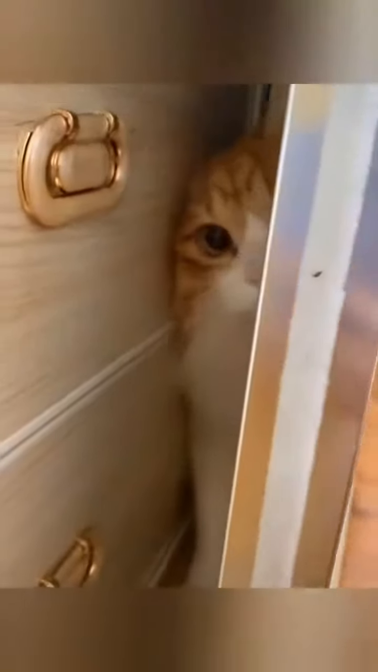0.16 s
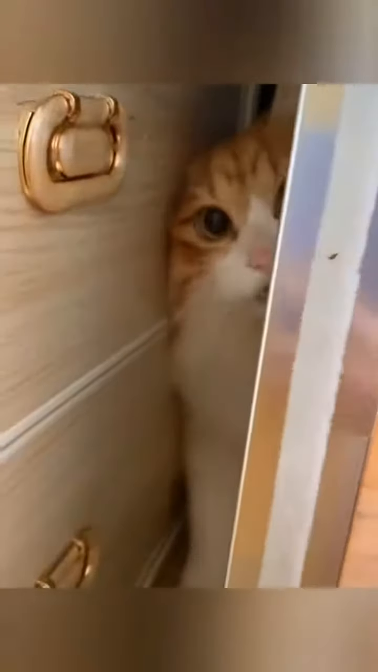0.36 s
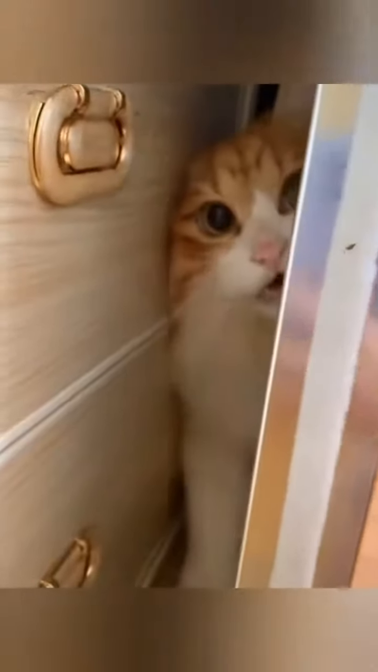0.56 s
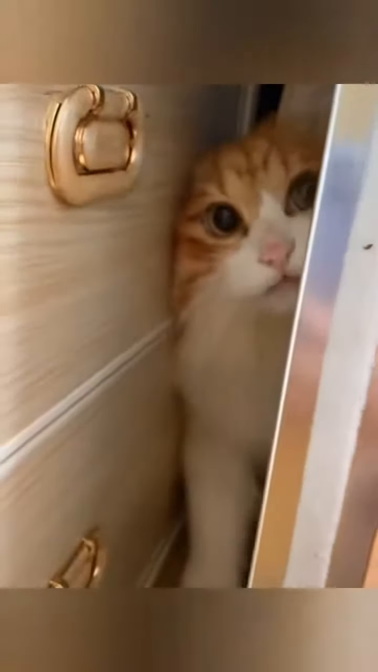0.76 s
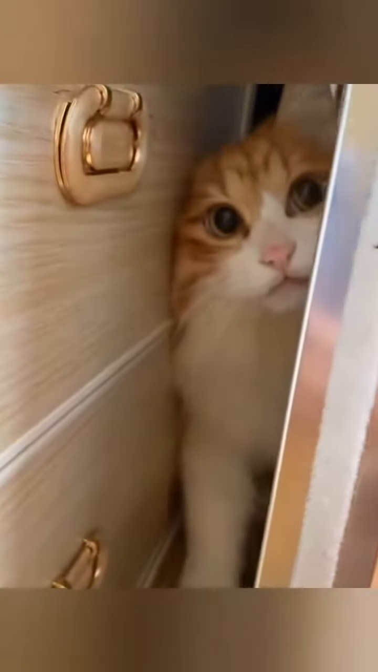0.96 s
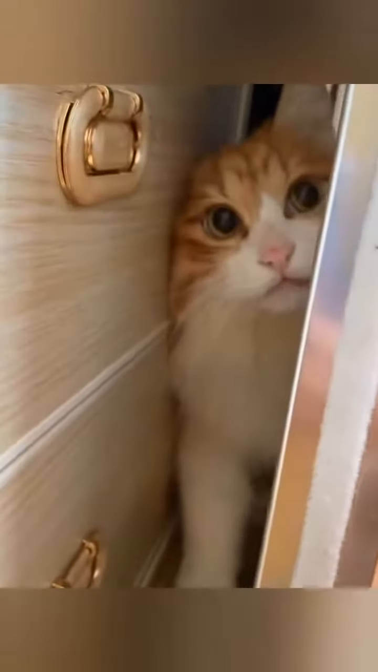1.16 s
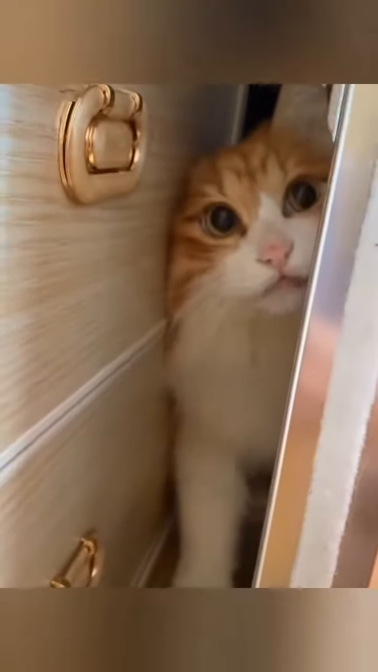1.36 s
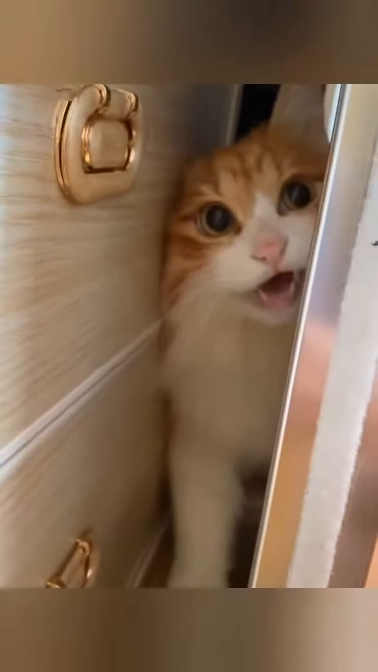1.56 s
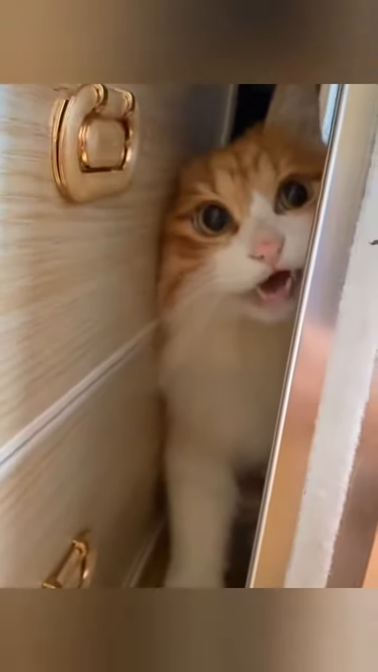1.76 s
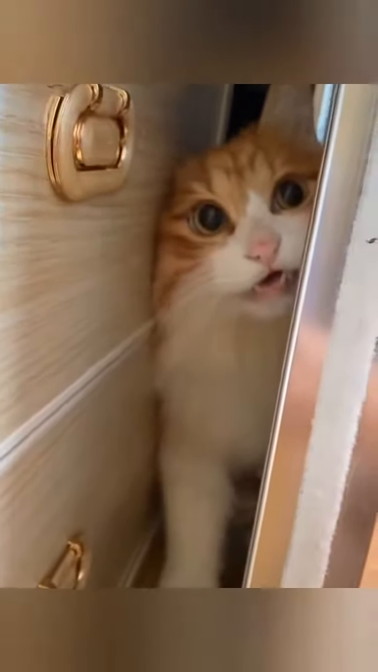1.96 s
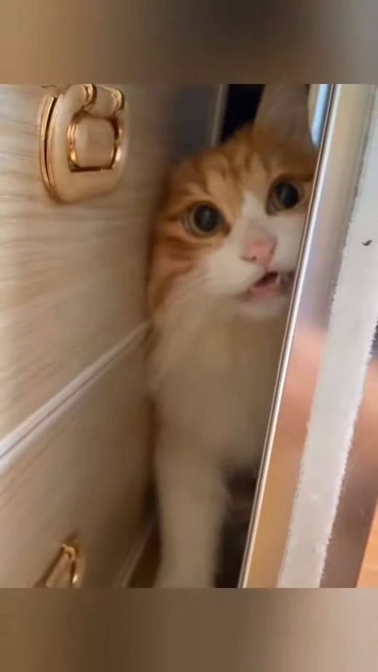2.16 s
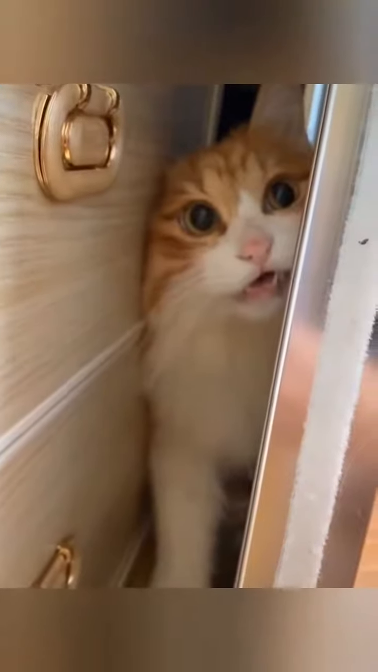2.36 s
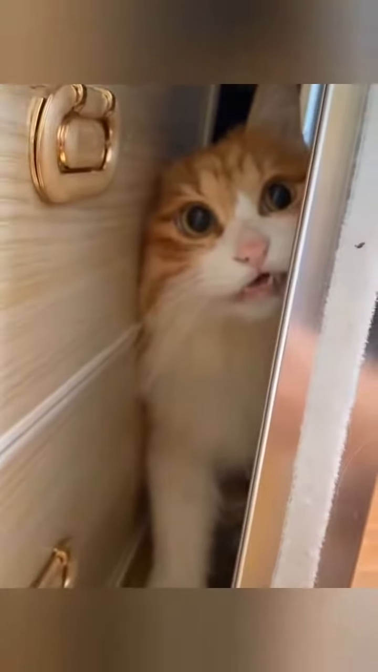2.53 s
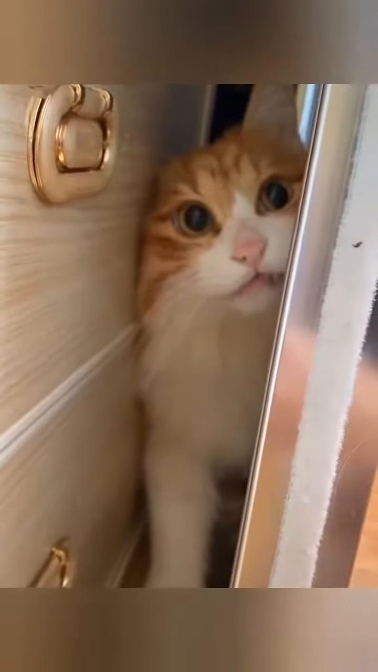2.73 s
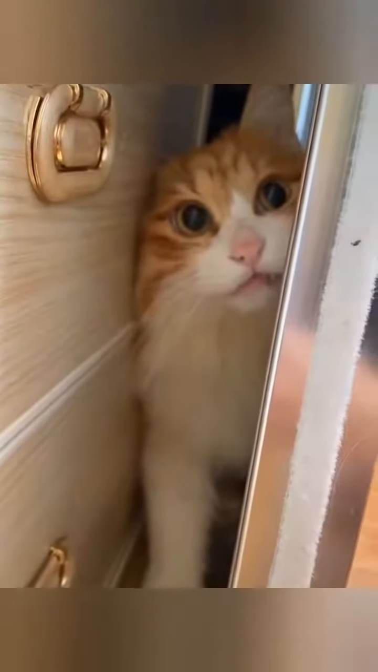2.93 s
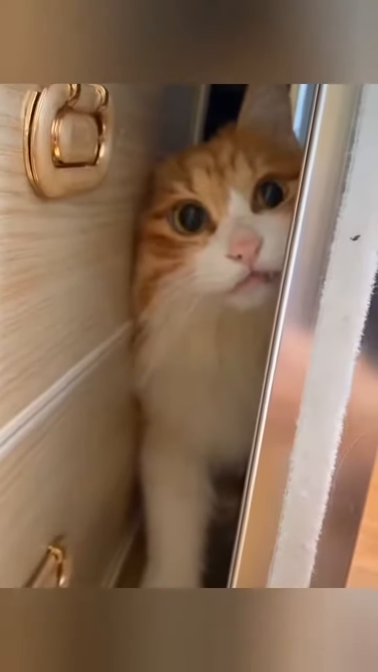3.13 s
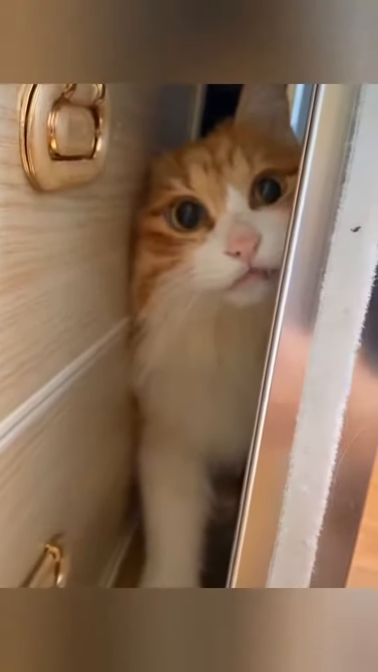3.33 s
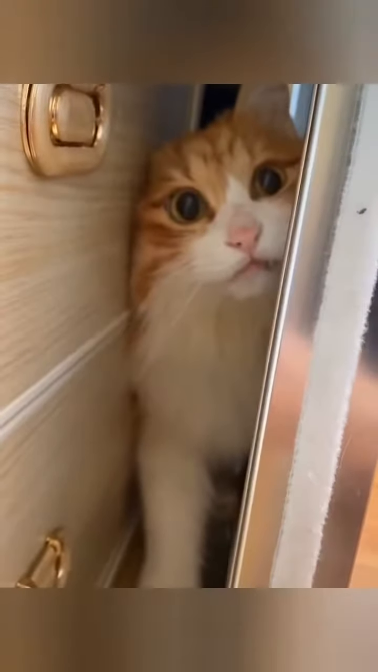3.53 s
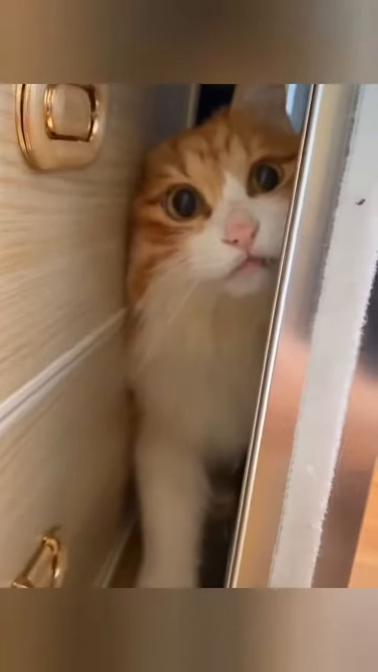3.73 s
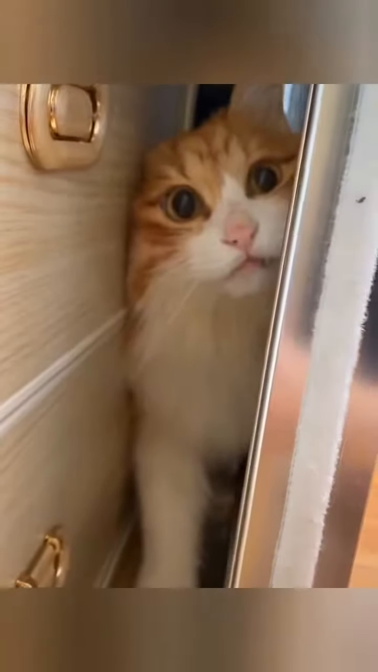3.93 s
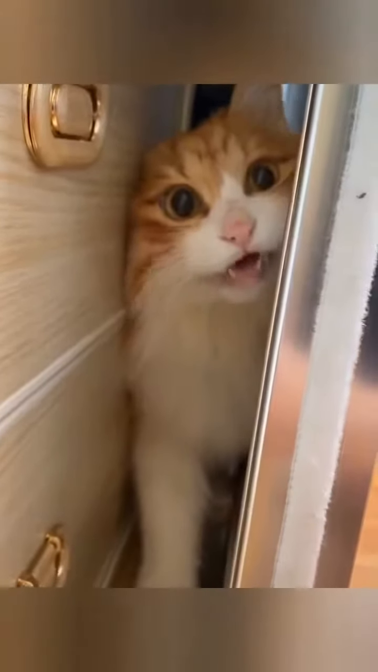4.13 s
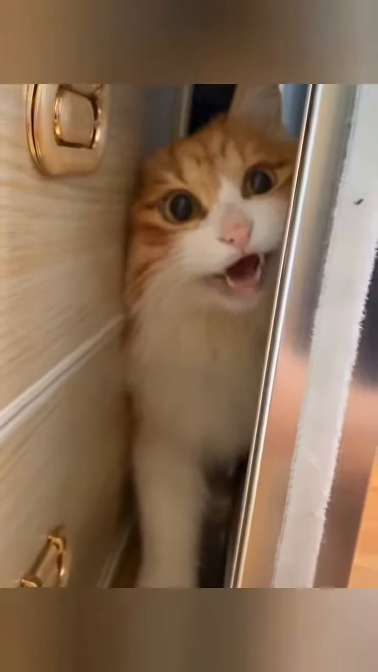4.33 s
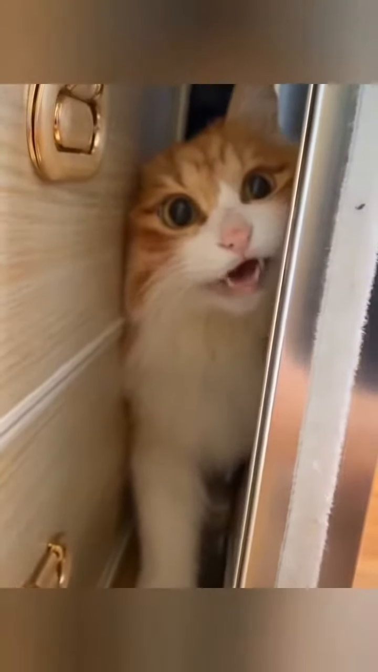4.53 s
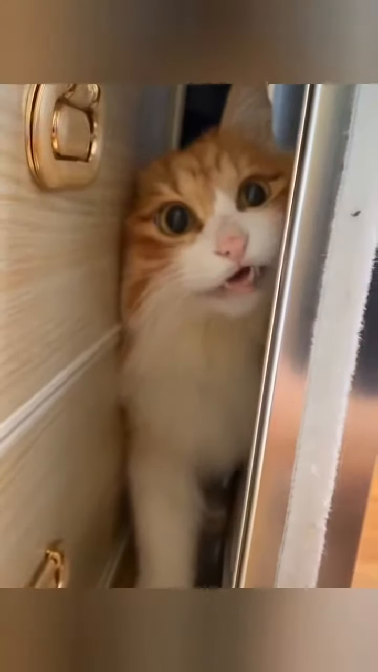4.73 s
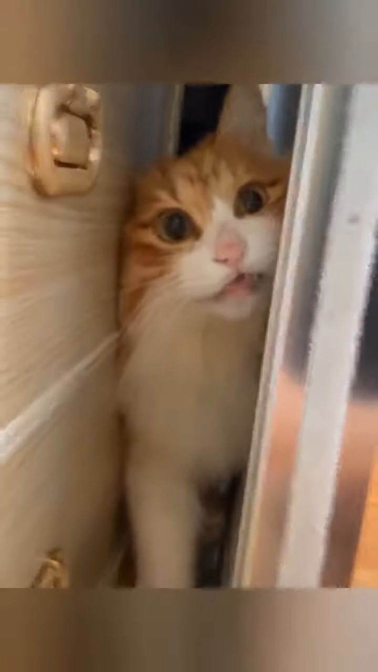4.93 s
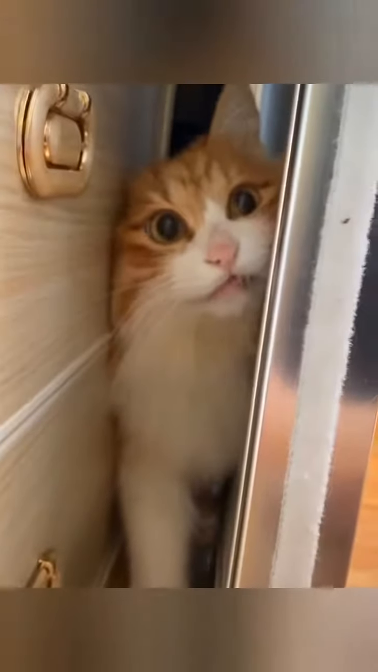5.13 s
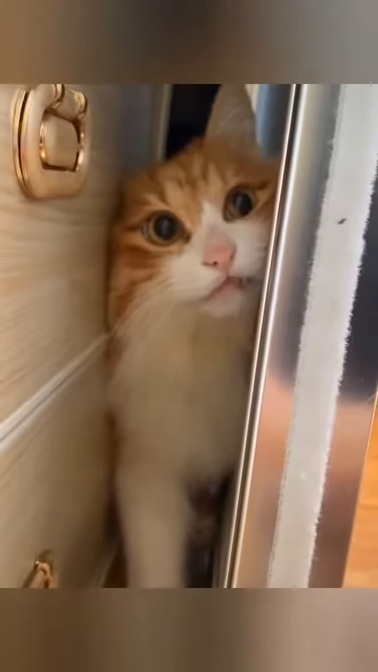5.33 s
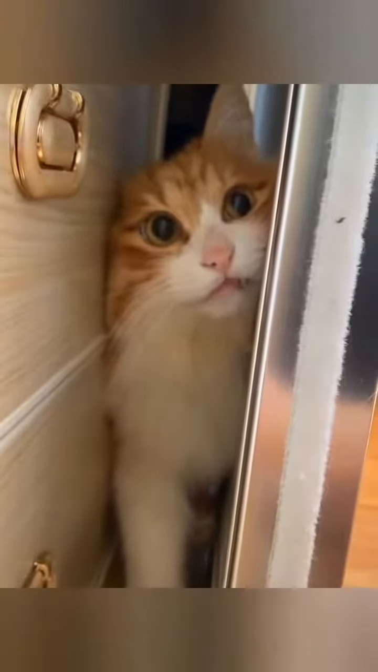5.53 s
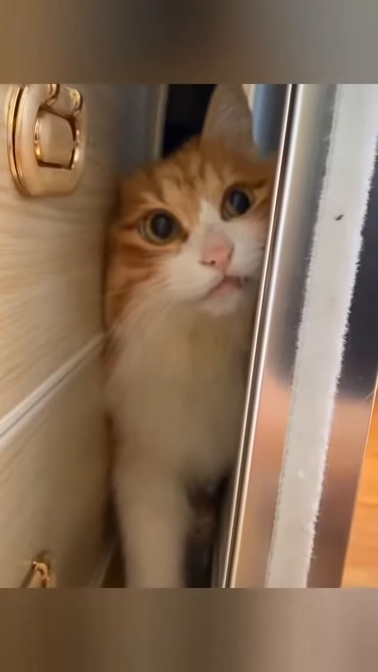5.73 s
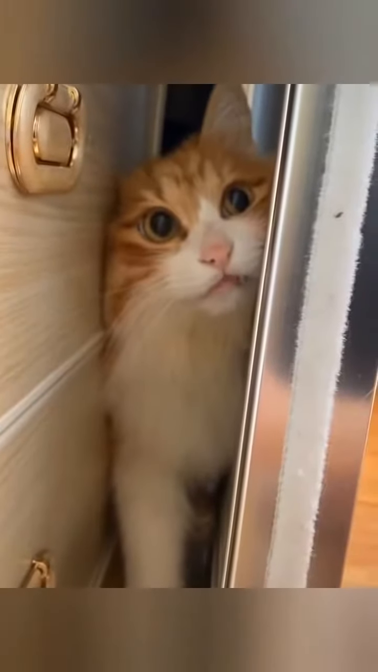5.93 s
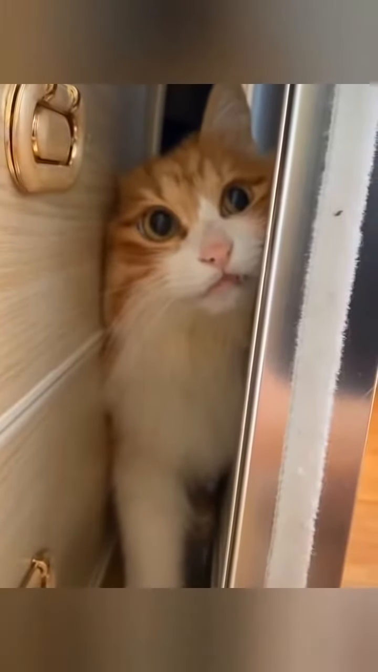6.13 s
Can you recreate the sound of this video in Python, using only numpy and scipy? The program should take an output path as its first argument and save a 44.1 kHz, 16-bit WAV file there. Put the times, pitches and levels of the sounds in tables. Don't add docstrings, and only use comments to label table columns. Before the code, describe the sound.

Low boomy traffic drifts in from afar, its tyre hiss swelling briefly near the start and then thinning. Over it a nearby cat calls: a quick mew, a gentle rising and falling meow, a strong short cry, then a drawn-out meow sinking in pitch. Mouth clicks and soft breaths close the sounds. The phone's two microphones hear the narrow door gap colour left and right differently.

```python
import sys
import numpy as np
from scipy import signal
from scipy.fft import rfft, irfft
from scipy.io import wavfile
from scipy.ndimage import uniform_filter1d

SR = 44100
rng = np.random.default_rng(int(sys.argv[2]) if len(sys.argv) > 2 else 0)


def elevation(decibels):
    levels = np.asarray(decibels, float)
    return 10 ** (levels / 20)


def wav_out(sig):
    wavfile.write(sys.argv[1], SR, np.round(np.clip(np.atleast_2d(sig).T, -1, 1) * 32767).astype(np.int16))


N = 276948


def evened(x):
    return x / np.sqrt(np.mean(x ** 2) + 1e-20)


def read(points, hz):
    f, *columns = np.transpose(points)
    return [np.interp(np.log(hz + 1), np.log(f + 1), c) for c in columns]


def play(rows):
    s, *columns = np.transpose(rows)
    t = np.arange(s[0], s[-1], 1 / SR)
    return s[0], [np.interp(t, s, c) for c in columns]


def add(mix, s, sound):
    part = mix[round(s * SR):][:len(sound)]
    part += sound[:len(part)]


def wobble(count, smooth):
    noise = rng.standard_normal(count)
    return evened(uniform_filter1d(uniform_filter1d(noise, smooth), smooth))


# pitch_hz [Hz], level_db [dB per Hz]
TRAFFIC_COLOUR = [(50, -2), (170, -5.5), (270, -11), (420, -16), (700, -16), (1000, -14.5), (1700, -26.5),
                  (2400, -28.5), (3300, -42.5), (5500, -51), (7600, -54.5), (10600, -56.5), (13400, -58.5),
                  (14200, -78.5)]
# pitch_hz [Hz], width_hz [Hz], boost_db [dB]
ROOM_BOOMS = [(60.3, 11, 5), (118.5, 14, 6), (154.7, 3.9, 10), (205, 6.7, 6.5), (253.4, 13, 6.5),
              (339, 12, 4)]
# pitch_hz [Hz], likeness [0-1], left_lead_rad [radians], left_minus_right_db [dB]
TRAFFIC_AT_PORTS = [(50, .995, 0, .3), (130, .97, 0, .8), (260, .88, -.1, 2.2), (420, .55, -.8, 4),
                    (700, .5, -2.4, 2), (1000, .35, -1.5, 0), (1700, .2, -3, 0), (2600, .65, -3.4, -1),
                    (3700, .35, -5.7, 0), (5500, .4, -5.5, 0), (7600, .9, -3.1, 0), (10700, .9, 0, 0),
                    (13000, .9, 3.1, 0)]
RUMBLE_DB, RUMBLE_DB_PER_S = -37, -0.67
ROAR_DB, HISS_DB, HISS_DB_PER_S = -37.5, -34.5, -1.5
SWISH_S, SWISH_WIDTH_S, SWISH_DB = 0.61, 0.47, 7
MICROPHONE_HISS_DB = -40.5


def traffic():
    size, hop = 1024, 256
    frames = N // hop + 40
    hz = np.fft.rfftfreq(size, 1 / SR)
    a, b, c, d, patches = rng.standard_normal((frames, len(hz), 5)).T
    patches = evened(uniform_filter1d(uniform_filter1d(patches, 10, 0), 14, 1))
    columns = read(TRAFFIC_COLOUR, hz) + read(TRAFFIC_AT_PORTS, hz)
    colour_db, same, lead, balance_db = (v[:, None] for v in columns)

    t = (np.arange(frames) - 20) * hop / SR
    rumble_db = RUMBLE_DB + RUMBLE_DB_PER_S * t
    swish_db = SWISH_DB * np.exp(-((t - SWISH_S) / SWISH_WIDTH_S) ** 2)
    hiss_db = HISS_DB + HISS_DB_PER_S * t + swish_db
    roar = np.clip(np.log2(hz / 300 + 1e-9), 0, 1)[:, None]
    hiss = np.clip(np.log2(hz / 1300 + 1e-9), 0, 1)[:, None]
    tyres = np.clip(np.log2(7000 / (hz + 1)), 0, 1)[:, None]
    top_db = tyres * hiss_db + (1 - tyres) * MICROPHONE_HISS_DB
    field_db = colour_db + 1.72 * patches
    field_db = field_db + (roar - hiss) * (ROAR_DB - rumble_db) + hiss * (top_db - rumble_db)

    right = a + 1j * b
    own = c + 1j * d
    left = (same * right + np.sqrt(1 - same ** 2) * own) * np.exp(1j * lead)
    tilt = elevation(balance_db / 2)
    spectra = np.array([left * tilt, right / tilt]) * elevation(field_db)
    noise = signal.istft(spectra, nperseg=size, noverlap=size - hop)[1]

    fine_hz = np.fft.rfftfreq(noise.shape[1], 1 / SR)
    boom = 1
    for f, width, db in ROOM_BOOMS:
        boom = boom + elevation(db) ** 2 / (1 + (2 * (fine_hz - f) / width) ** 2)
    street = irfft(rfft(noise) * np.sqrt(boom))[:, 20 * hop:20 * hop + N]
    return evened(street) * elevation(RUMBLE_DB + RUMBLE_DB_PER_S * np.arange(N) / SR)


# start_s [s], peak_s [s], end_s [s], pitch_hz [Hz], peak_db [dB]
ENGINE_NOTES = [
    (0.287, 0.507, 0.79, 152.5, -35.5),
    (2.616, 2.806, 3.4, 522, -53),
]


def drone(start, peak, end, hz, peak_db):
    t = np.arange(start, end, 1 / SR)
    db = peak_db + np.interp(t, [start, peak, end], [-18, 0, -18])
    tone = np.sqrt(2) * np.sin(2 * np.pi * hz * t)
    return start, elevation(db) * tone * signal.windows.tukey(len(t), .3)


# pitch_hz [Hz], level_db [dB per Hz]
BREATH_COLOUR = [(200, -12), (500, 3), (1200, 0.5), (2300, 1.5), (3500, -2.5), (4800, -10), (6000, -5.5),
                 (8000, -20), (11000, -24), (12800, -34), (14500, -20), (16000, -29)]


def air(count, tilt_db):
    hz = np.fft.rfftfreq(count, 1 / SR)
    shape = elevation(read(BREATH_COLOUR, hz)[0] + tilt_db * np.log2((hz + 100) / 2300))
    return evened(irfft(rfft(rng.standard_normal(count)) * shape, count))


# time_s [s], pitch_hz [Hz], effort_db [dB], mouth_opening [0-1], fold_pressure [0-1]
SHORT_MEOW = [
    (0.478, 863, -39.5, 1, 1),
    (0.489, 816, -33.5, 0.68, 0.99),
    (0.507, 818, -31.5, .75, 1),
    (0.529, 758.6, -27.5, 0.98, 0.7),
    (0.558, 739, -25, 0.98, 0.64),
    (0.589, 755, -25, .7, 0.24),
    (0.612, 785, -31.5, 0.57, 0.57),
    (0.632, 807, -38.5, 0.7, .3),
]
ARCHED_MEOW = [
    (1.563, 790, -38, 1, .5),
    (1.572, 771.5, -29, 0.77, 0.82),
    (1.607, 817, -29, 0.86, 0.91),
    (1.635, 832.6, -30, 0.91, 0.9),
    (1.67, 836.5, -28.5, 0.68, 0.8),
    (1.741, 790.3, -32, 0.81, 0.73),
    (1.782, 781.5, -31, 0.77, 0.51),
    (1.88, 773.4, -28.5, 0.48, 0.27),
    (1.935, 776, -41.5, .05, 0.16),
]
LOUD_MEOW = [
    (2.35, 825, -33, 0.62, 1),
    (2.364, 755, -24.5, 0.66, 0.77),
    (2.39, 736, -21.5, 0.77, 0.55),
    (2.42, 756.6, -22.5, 0.72, 0.7),
    (2.458, 745, -21.5, 0.53, .7),
    (2.504, 736, -19.5, 0.46, 0.36),
    (2.52, 753.6, -21, 0.38, .3),
    (2.54, 726, -22, 0.52, 0.095),
    (2.561, 725, -42.5, .6, .45),
]
LONG_MEOW = [
    (4.264, 787, -41, 1, .8),
    (4.271, 763, -27, 0.65, 0.86),
    (4.302, 824, -31, 1, 1),
    (4.35, 837.7, -25.5, 0.7, 0.64),
    (4.444, 800.7, -29, 0.85, 0.58),
    (4.62, 767.5, -28.5, 0.59, 0.23),
    (4.773, 758, -26.5, .56, 0.32),
    (4.9, 738, -24, 0.35, 0.22),
    (4.995, 703, -34.5, 0.37, 0.51),
]
# higher_overtones_db [dB
# over effort], brightness [dB per octave], fourth_overtone_db [dB]
MEOW_COLOURS = [
    (-8.5, 0, 4.5),
    (-11, 1, 4.5),
    (-14.5, 3.5, 8),
    (-10, -5, -6),
]
# pitch_hz [Hz], level_db [dB]
OPEN_THROAT = [(2900, -4.5), (3300, 1), (3750, 6), (4150, 0), (4550, -10), (5000, -4), (5300, -25.5),
               (5800, -17), (6100, -11.5), (6700, -16), (7700, -37), (9000, -31.5), (11500, -34),
               (15000, -41.5)]
SHUT_THROAT = 0.94
SECOND_DB, SECOND_SLACK_DB = -5, -27
THIRD_DB, THIRD_SHUT_DB = 5, -40
HIGH_SHUT_DB, HIGH_SLACK_DB = -150, -17
HIGH_RISE_S = 0.0043
RASP_DB, ONSET_RASP_DB, ONSET_S, END_RASP_DB, END_S = -35.5, 12, .015, 13, .025


def meow(rows, high_db, slope_db, fourth_db, jitter=0.0032, shimmer_db=0.71, blur=0.0042):
    start, (hz, first_db, mouth, press) = play(rows)
    n = len(hz)
    t = np.arange(n) / SR
    shut, slack = 1 - mouth, 1 - press
    second_db = first_db + SECOND_DB + SECOND_SLACK_DB * slack
    third_db = first_db + THIRD_DB + THIRD_SHUT_DB * shut
    high_db = first_db + high_db + HIGH_SHUT_DB * shut ** 4 + HIGH_SLACK_DB * slack
    throat_shift = SHUT_THROAT + (1 - SHUT_THROAT) * mouth

    turns = 2 * np.pi * np.cumsum(hz * (1 + jitter * wobble(n, smooth=120))) / SR
    rasp_db = RASP_DB + ONSET_RASP_DB * np.exp(-t / ONSET_S) + END_RASP_DB * np.exp((t - t[-1]) / END_S)
    rasp_db = rasp_db + 9 * np.exp(-t / .07)
    turns += .6 * elevation(rasp_db) * wobble(n, smooth=24)
    sway_db = [shimmer_db * wobble(n, smooth=300) for k in range(21)]

    voice = np.zeros(n)
    for k, db in enumerate([first_db, second_db, third_db], 1):
        voice += elevation(db + sway_db[k]) * np.sin(k * turns + k)

    strength = {}
    for k in range(4, 21):
        throat_db = read(OPEN_THROAT, k * hz / np.clip(throat_shift, .8, 1.25))[0]
        strength[k] = elevation(throat_db + slope_db * np.log2(k / 5) + fourth_db * (k == 4))
    total = np.sqrt(sum(strength[k] ** 2 for k in range(4, 9)))
    high = np.zeros(n)
    for k in strength:
        wander = k * k * (1 + blur * wobble(n, smooth=40))
        high += strength[k] * elevation(3.3 * sway_db[k]) * np.sin(k * turns + wander)
    voice += np.clip(t / HIGH_RISE_S, 0, 1) * elevation(high_db) / total * high

    rasp = 1 + elevation(rasp_db) * wobble(n, smooth=24)
    hiss_db = high_db - 31 + 0.45 * (rasp_db - RASP_DB)
    hiss = elevation(hiss_db) * (1 + 0.72 * np.cos(turns)) * air(n, -1.5)
    return start, (np.sqrt(2) * voice * rasp + hiss) * signal.windows.tukey(n, 400 / n)


# start_s [s], peak_db [dB], ring_hz [Hz], fade_by_60_db_s [s]
MOUTH_CLICKS = [(0.6276, -22, 2220, 0.0082), (.632, -21, 2120, 0.0063), (0.637, -27.5, 2370, 0.01),
                (1.354, -50, 14460, 0.0086), (1.364, -47.5, 4750, 0.018), (1.786, -39.5, 5350, 0.014),
                (2.540, -21, 2250, 0.0088), (2.548, -21.5, 2360, 0.0048), (2.551, -26.5, 2180, 0.007),
                (1.785, -41, 8650, .012), (2.571, -27.5, 410, 0.044), (3.654, -36.5, 877, 0.0097),
                (4.071, -46.5, 4820, 0.017), (4.088, -50, 9700, 0.0077), (4.959, -22.5, 1262, 0.023),
                (4.958, -46, 5680, 0.009), (4.963, -20.5, 616, 0.086), (4.958, -26, 277, 0.16),
                (4.976, -28.5, 72.3, 0.28), (4.988, -22, 2290, 0.0085), (4.989, -23.5, 312, 0.064),
                (4.9874, -34, 3700, 0.015), (4.991, -26, 2545, 0.015), (5.009, -26.5, 865, 0.023),
                (5.012, -35.5, 2370, 0.016), (5.136, -60.5, 10500, .012)]


def click(s, peak_db, hz, t60, snap_db=-22, snap_t60=.006):
    t = np.arange(SR // 8) / SR
    ring = elevation(-60 * t / t60) * np.sin(2 * np.pi * hz * t) * np.clip(t * hz / 0.61, 0, 1)
    snap_db = snap_db + 6 * np.log2(min(hz / 2000, 1))
    snap = elevation(snap_db - 60 * t / snap_t60) * air(len(t), -4)
    return s, elevation(peak_db) * (ring + snap)


# start_s [s], level_db [dB], rise_s [s], fade_by_60_db_s [s], tilt [dB per octave]
AIR_PUFFS = [(0.63, -40.5, 0.0072, 0.16, -3), (1.346, -64, .008, .15, 14), (1.7815, -57.5, 0.0073, .2, 9.5),
             (2.549, -52.5, 0.01, 0.16, -0.5), (2.560, -40.5, 0.012, 0.19, -2.5),
             (3.762, -47.5, 0.12, 0.32, -9), (4.063, -60.5, 0.011, 0.18, 16),
             (4.322, -50.5, 0.021, 0.21, -2.5), (4.9544, -30.5, 0.006, 0.24, -14.5),
             (4.987, -38.5, 0.0044, 0.22, -3), (1.49, -63.5, 0.077, .1, 2), (2.332, -59, .02, .09, 1),
             (4.19, -56.5, 0.086, .1, -1.5)]


def puff(s, level_db, rise, t60, tilt_db):
    t = np.arange(SR // 3) / SR
    flutter_db = 2.2 * wobble(len(t), smooth=120)
    fade_db = -60 * np.maximum(t - rise, 0) / t60
    shape = np.clip(t / rise, 0, 1) * elevation(level_db + fade_db + flutter_db)
    return s, shape * air(len(t), tilt_db)


# pitch_hz [Hz], left_lead_rad [radians], left_minus_right_db [dB]
GAP_TO_PORTS = [(250, -.1, 1), (740, -.9, 10), (840, -1.7, -1), (1500, -.1, 0), (1670, -.6, 8),
                (2200, -.6, 2), (2480, -2.4, -6), (3000, -3.4, -2), (3320, -3.9, 11), (3900, -6.7, 2),
                (4800, -6.9, 1), (7400, -3.2, 0), (12000, 1.6, 0), (15500, 6.3, 0)]
NOTCH_HZ, NOTCH_WIDTH_HZ, NOTCH_DB = 803.3, 22, -14
LEAN_TOP_HZ = 1800


def gap(x, lean):
    hz = np.fft.rfftfreq(N, 1 / SR)
    lead, balance_db = read(GAP_TO_PORTS, hz)
    lead = lead + lean * np.exp(-(hz / LEAN_TOP_HZ) ** 2)
    left = elevation(balance_db / 2) * np.exp(.5j * lead)
    ports = np.array([left, 1 / left])
    ports /= np.maximum(abs(ports.mean(0)), .3)
    off = 2j * (hz - NOTCH_HZ) / NOTCH_WIDTH_HZ
    notch = (elevation(NOTCH_DB) + off) / (1 + off)
    return irfft(rfft(x) * ports * notch, N)


HEAD_LEANS = [-.8, -.3, -.15, .35]


def scene():
    far, mouth, calls = np.zeros(N), np.zeros(N), np.zeros((4, N))
    for row in ENGINE_NOTES:
        add(far, *drone(*row))
    meows = [SHORT_MEOW, ARCHED_MEOW, LOUD_MEOW, LONG_MEOW]
    for call, rows, colour in zip(calls, meows, MEOW_COLOURS):
        add(call, *meow(rows, *colour))
    for row in MOUTH_CLICKS:
        add(mouth, *click(*row))
    for row in AIR_PUFFS:
        add(mouth, *puff(*row))
    return traffic() + far + sum(map(gap, calls, HEAD_LEANS)) + gap(mouth, 0)


def top_cut(x):
    return signal.sosfilt(signal.butter(12, 16070, fs=SR, output="sos"), x)


def record(dry):
    bass_cut = signal.butter(4, 46., "high", fs=SR, output="sos")
    heard = signal.sosfilt(bass_cut, dry)
    return top_cut(heard)


dry = scene()
out = record(dry)
wav_out(out)
```